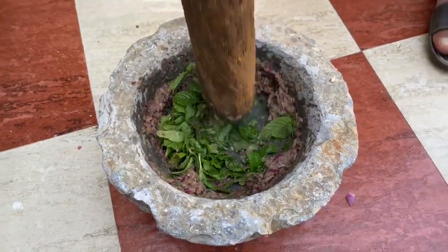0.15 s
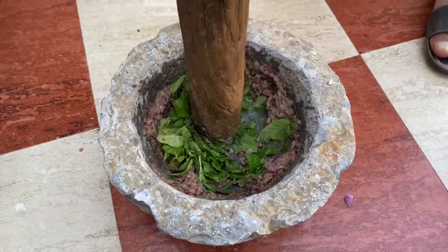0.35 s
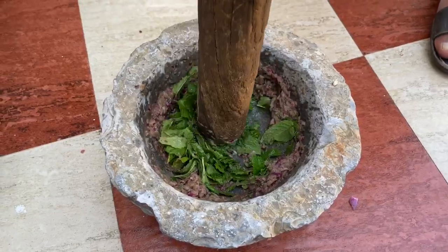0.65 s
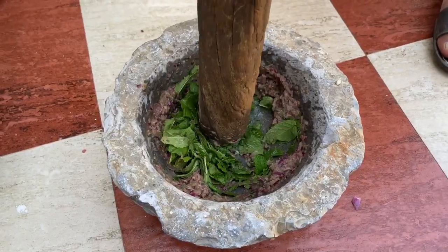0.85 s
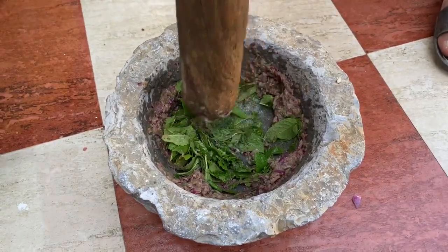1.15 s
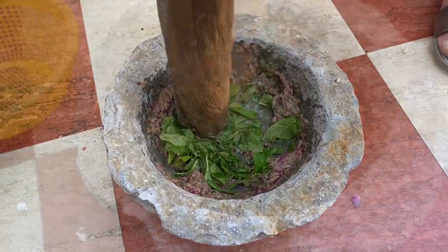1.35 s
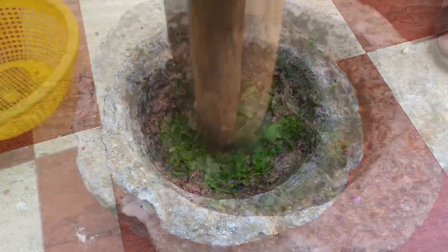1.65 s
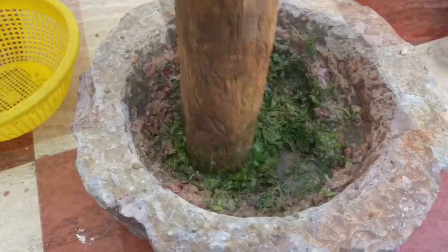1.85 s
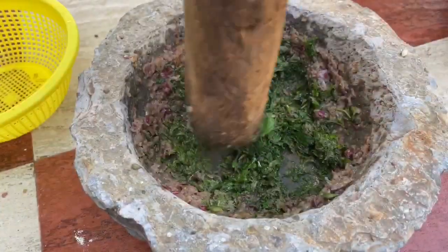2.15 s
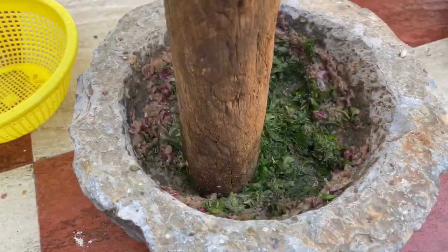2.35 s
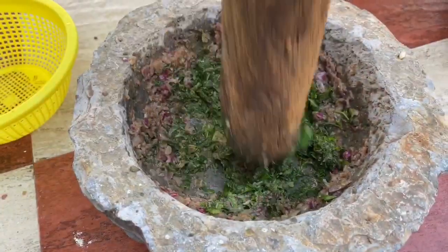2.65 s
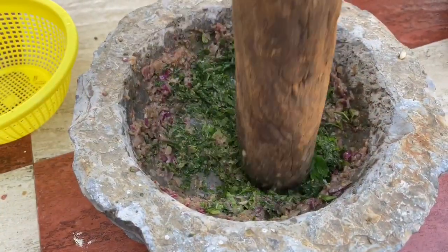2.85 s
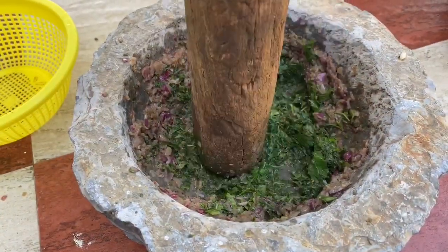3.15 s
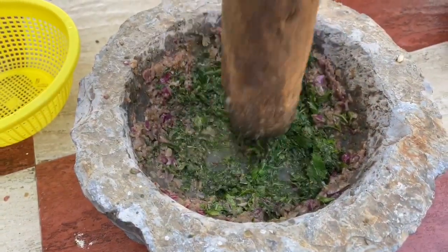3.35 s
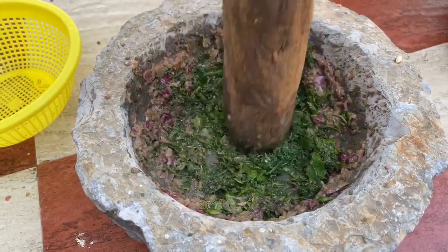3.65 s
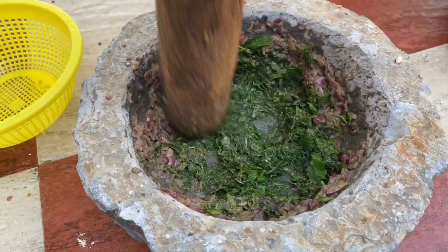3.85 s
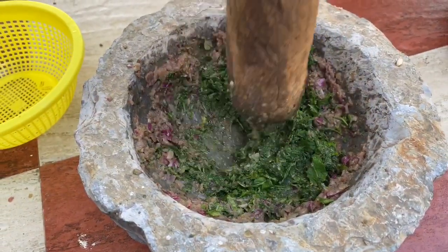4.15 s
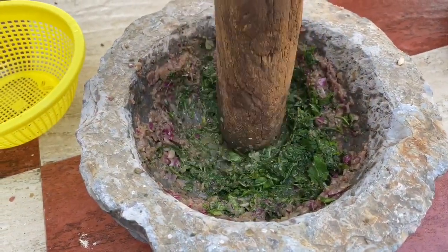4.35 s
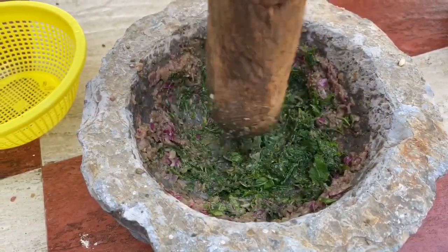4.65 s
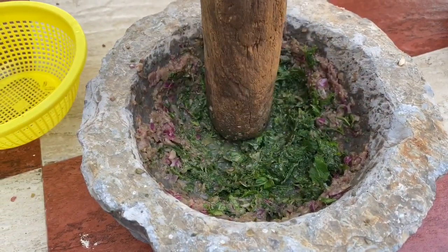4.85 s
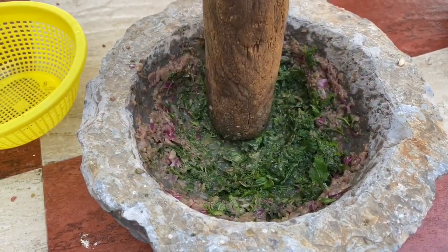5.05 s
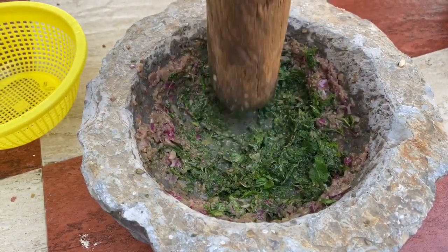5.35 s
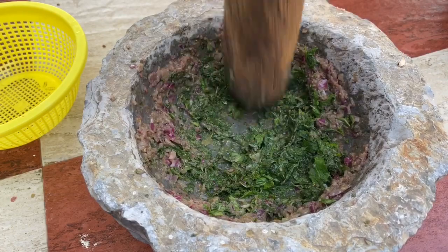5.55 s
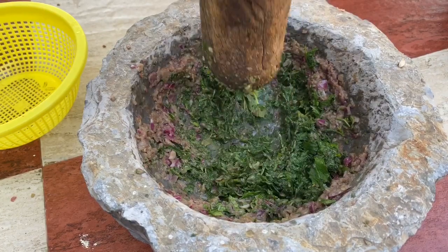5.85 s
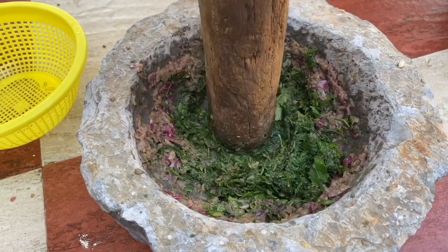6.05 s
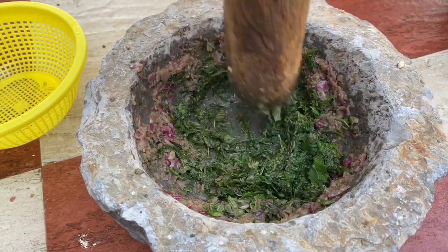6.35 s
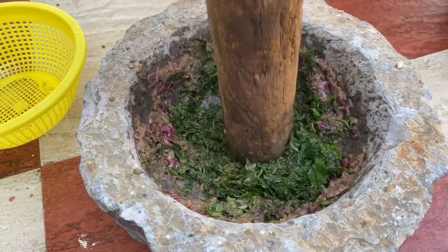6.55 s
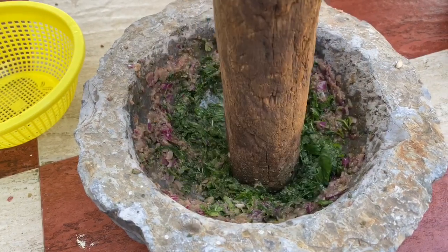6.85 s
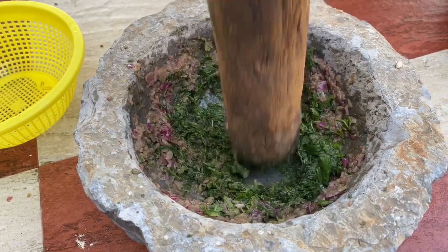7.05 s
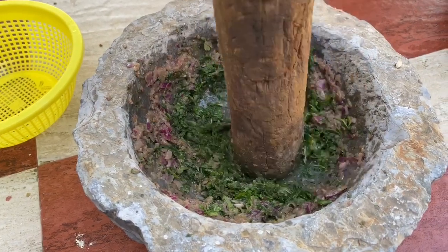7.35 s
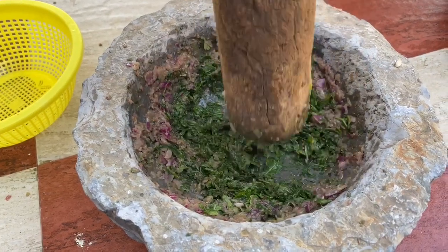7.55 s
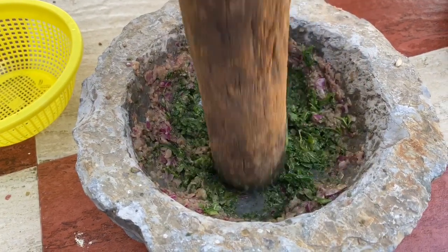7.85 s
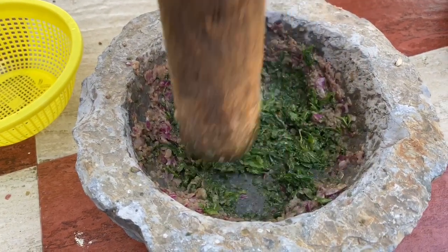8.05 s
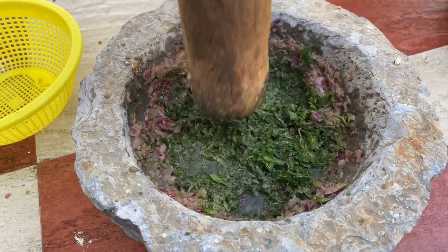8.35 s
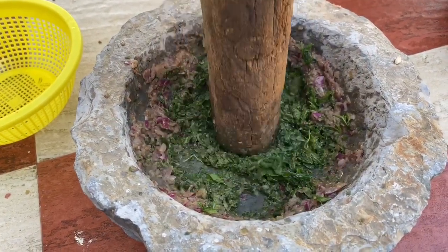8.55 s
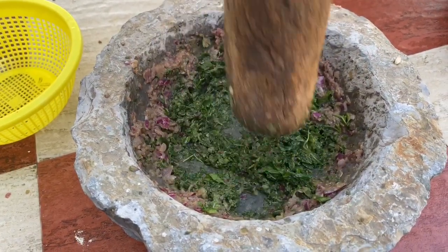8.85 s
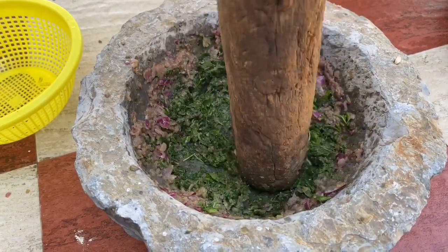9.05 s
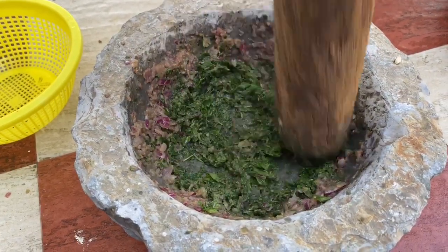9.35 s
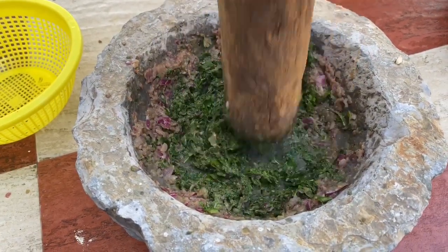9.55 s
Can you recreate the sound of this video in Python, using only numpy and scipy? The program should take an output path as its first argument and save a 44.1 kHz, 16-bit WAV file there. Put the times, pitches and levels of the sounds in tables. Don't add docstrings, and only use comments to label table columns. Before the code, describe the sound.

A heavy wooden pestle pounds wet leaves in a stone mortar, deep short thuds with knocks, juicy squelches and small snaps in a tiled kitchen.

```python
import sys
import numpy as np
from scipy import signal
from scipy.fft import rfft, irfft, next_fast_len
from scipy.io import wavfile
from scipy.ndimage import uniform_filter1d

SR = 44100
rng = np.random.default_rng(int(sys.argv[2]) if len(sys.argv) > 2 else 0)


def field_ratio(decibels):
    return 10 ** (np.asarray(decibels, dtype=float) / 20)


def put_to_file(sound):
    columns = np.atleast_2d(sound).T
    safe = np.clip(columns, -1, 1)
    whole_steps = np.round(safe * 32767)
    wavfile.write(sys.argv[1], SR, whole_steps.astype(np.int16))


N = 428211

# [f/Hz, level/dB, choke time/s, left minus right/dB]
WOOD_MODES = [(471.4, -9.5, 0.031, 18), (621.4, -2.5, 0.034, 7.5), (727.6, 4, 0.02, -1),
              (801.3, 0, 0.017, 17.5)]
STONE_MODES = [(937, -0.5, 0.028, -8), (1154, -4, 0.017, 20), (1320, 6, 0.006, 5.5),
               (1473, -8.5, 0.031, 14.5), (1865, -8.5, 0.045, 7.5), (2268, -33, 0.019, 6.5),
               (2895, -30.5, 0.1, -23.5)]
BOWL_MODES = [(188.5, -8.5, 0.032, -1.5), (215.8, 1, 0.027, 8.5), (243.8, 9.5, 0.015, -4.5),
              (316.4, -3.5, 0.045, 0.25), (417, -8, 0.017, -3)]
SLAB_MODES = [(92, -22, 0.097, -8.5), (100.9, -2, 0.038, 5.5), (122.6, -1.5, 0.031, -11)]


def blows():
    times, peak_db, slab_db, wood_db = contacts().T
    crack_db = np.maximum(1.5 + 2.2 * wood_db, wood_db - 10)
    knock_db = np.minimum(wood_db, -7.5)
    wood = struck_body(WOOD_MODES, peak_db + knock_db + 2.5)
    stone = struck_body(STONE_MODES, peak_db + crack_db + 2.0)
    bowl = struck_body(BOWL_MODES, peak_db - 2.5, crossing_s=0.0012)
    slab = struck_body(SLAB_MODES, peak_db + slab_db + 4.5, crossing_s=0.0033)
    return wood + stone - bowl - slab


def struck_body(modes, level_db, crossing_s=0):
    bending_s, first_hz = 0.09, 800
    spread_db, detune_share = 1.5, 0.03
    starts = contacts()[:, 0]
    out = np.zeros((2, N + SR))
    t = np.arange(SR // 8) / SR
    chance = rng.standard_normal((len(starts), len(modes), 2))
    for k, (hz, db, choke_s, pan_db) in enumerate(modes):
        late_s = crossing_s + max(0, bending_s * (hz ** -0.5 - first_hz ** -0.5))
        swell = 1 - np.exp(-t * hz * 5)
        choke = field_ratio(-60 * (t / choke_s / 1.333) ** 1.94)
        pan = field_ratio(np.array([[pan_db], [-pan_db]]) / 2)
        for start, blow_db, (luck, detune) in zip(starts, level_db, chance[:, k]):
            at = max(0, int((start + late_s) * SR))
            tone = np.sin(2 * np.pi * hz * (1 + detune_share * detune) * t)
            level = field_ratio(blow_db + db + spread_db * luck)
            out[:, at:at + len(t)] += level * swell * choke * tone * pan
    return out[:, :N]


# [t/s, peak level/dB, slab thump/dB re peak,
# wood knock (hardness)/dB re peak, pulp squirt level/dB]
STROKES = [(0.0, -15, -12, -6.5, -22), (0.397, -14, -2, -13, -34.5), (1.263, -24, 0, -42, -67),
           (1.47, -28.5, -6, -2.5, -39), (1.508, -18.5, -6, -15.5, -29.5), (1.699, -17.5, -7, -8, -36),
           (1.902, -9.5, -7.5, -6, -21), (2.295, -21, -21, -5.5, -26), (2.736, -8, -4.5, -6.5, -19.5),
           (3.145, -8, -8, -9.5, -21), (3.526, -8.5, -2.5, -8, -19), (3.916, -24, -0.5, -18, -36),
           (4.331, -7, -6.5, -8, -18.5), (4.784, -8, -4.5, -8.5, -19), (5.582, -19.5, -28, -12.5, -38.5),
           (6.039, -8, -9, -10, -56), (6.449, -13.5, -7.5, -13.5, -31), (6.886, -9, -2, -6, -16),
           (7.317, -19, -0.5, -15, -27), (7.705, -13.5, -5, -16.5, -24.5),
           (8.1514, -6.5, -7.5, -7.5, -22.5), (8.574, -7, -4.5, -8.5, -17), (8.9854, -8, -6, -5.5, -15),
           (9.409, -15.5, -2.5, -8.5, -16)]
# [t/s, peak level/dB, slab thump/dB re peak, wood knock/dB
REBOUNDS = [(0.01, -13, -16, -12), (0.023, -18, -39, -20), (2.036, -30, -37, -19), (2.302, -22.5, 2, -16),
            (2.328, -29.5, 4.5, -11), (2.355, -22.5, -15, -14.5), (2.452, -29, -20, -31),
            (3.162, -17.5, -9, -9), (3.275, -28.5, -11.5, -15), (3.904, -25, -22.5, -14),
            (3.932, -36.5, -0.5, -24), (3.981, -39.5, -19, -11), (4.096, -31, -41, -15),
            (5.269, -38, -20, -18), (5.598, -21, 0, -22), (5.632, -19.5, -8.5, -14.5),
            (5.754, -34.5, -1.5, -4), (6.064, -20, -2, -11), (6.177, -31.5, -4, -19),
            (6.473, -17.5, -8, -9.5), (7.34, -26, 8, -17), (7.727, -12.5, -0.5, -11), (8.179, -18, -5, -8),
            (9.429, -21, 0.5, -16)]


def contacts():
    return np.array(sorted([row[:4] for row in STROKES] + REBOUNDS))


# [f/Hz, level/dB]
PULP_TONE = [(600, 1), (1300, 0.5), (2300, 1.5), (3200, -3), (4500, -1.5), (6200, -3.5), (8200, -9),
             (10200, -5), (12200, -14), (14200, -2.5), (15500, -39), (16400, -50.5)]
# [f/Hz, left minus right/dB]
PULP_BALANCE = [(700, 5.5), (1300, -1.5), (2400, -1.5), (4400, 0.5), (8000, -4.5), (15000, 1.5)]


def pulp():
    t, dull, bright = np.arange(N) / SR, np.zeros(N), np.zeros(N)
    for crest_s, db, swell_ms, fade_ms, bright_db in bursts():
        near = slice(max(0, int((crest_s - 0.1) * SR)), int((crest_s + 0.25) * SR))
        ms = (t[near] - crest_s) * 1000
        rise = np.exp(-np.abs(ms / swell_ms / 0.89) ** 1.02)
        crest = np.where(ms < 0, rise, np.exp(-ms / fade_ms))
        squelch = field_ratio(-25.5) * (ms > 0) * np.exp(-(ms / 52) ** 4)
        dull[near] += field_ratio(db - bright_db / 2) * (crest + squelch)
        bright[near] += field_ratio(db + bright_db / 2) * (crest + squelch)
    cells_per_s = 8000
    sizes = field_ratio(4.5 * np.minimum(rng.exponential(1, N), 5)) * rng.choice([-1, 1], N)
    grains = rms_one(sizes * (rng.random(N) < cells_per_s / SR))
    grains = grains + 0.96 * rng.standard_normal((2, N))

    def high_share(hz):
        return 1 / (1 + (5500 / (hz + 1)) ** 4)

    def tone(hz):
        balance_db = np.array([[1], [-1]]) * at_hz(PULP_BALANCE, hz) / 2
        bass_cut = hz ** 2 / (hz ** 2 + 400 ** 2)
        return field_ratio(at_hz(PULP_TONE, hz) + balance_db) * bass_cut

    mix = shape(grains * dull, lambda hz: 1 - high_share(hz)) + shape(grains * bright, high_share)
    mix = patchy(mix, cycles=5.5, patchy_db=1.6, rate=9.0)
    return field_ratio(7.5) * shape(mix, tone)


# [t/s of crest, level/dB, fade/ms, brightness/dB]
CRUSHES = [(0.39, -19.5, 5.4, -7), (1.2544, -22, 4.9, -7), (1.498, -27, 5, -3), (1.694, -25, 6.4, -2),
           (2.319, -41.5, 6.9, -10), (2.3292, -42, 3.4, -5), (2.728, -19, 2.2, -1), (3.139, -21, 3.3, -4),
           (3.516, -27, 2.3, -10), (3.886, -39, 9.7, -11), (3.907, -30, 7.3, 1), (3.936, -34.5, 2.2, 13),
           (4.3632, -35, 9.4, 5), (4.837, -39.5, 8.1, -1), (5.611, -27.5, 10, -5), (5.6274, -32, 12, -6),
           (5.649, -37, 2.7, 6), (6.0293, -13.5, 6.6, -2), (6.443, -16.5, 4.5, 1), (6.874, -31.5, 10, 0),
           (7.3407, -22.5, 3.7, -3), (7.7285, -19.5, 2.6, -11), (8.1434, -15.5, 2.6, 6),
           (8.193, -43, 21, 2), (8.565, -23, 2.4, -7), (8.977, -16, 3, 1)]
# [t/s, level/dB, fade/ms, pop level/dB]
LIFTS = [(0.115, -46, 13, -64), (1.377, -51, 30, -60), (2.0632, -48, 13, -60), (2.465, -42, 12, -39),
         (2.8686, -43.5, 12, -43), (3.285, -50.5, 53, -30), (3.6644, -42.5, 31, -24),
         (4.0734, -51.5, 42, -28), (4.508, -47.5, 25, -45), (5.1962, -52, 20, -28.5),
         (5.28, -50.5, 47, -57), (5.345, -54.5, 27, -45), (5.7436, -45, 32, -45), (6.1755, -44, 6.3, -50),
         (6.588, -44, 14, -38), (7.0355, -50, 5, -27), (7.053, -46, 8, -55), (7.457, -47.5, 40, -60),
         (8.2828, -42.5, 7.9, -44), (8.299, -47.5, 7.8, -58), (8.684, -48.5, 16, -60),
         (9.125, -47.5, 135, -28), (9.537, -41.5, 10.6, -73)]


def bursts():
    squirts = [(s - 0.001, db, 1.7, 7.8, 11 + 0.5 * db) for s, *_, db in STROKES]
    crushes = [(s, db, max(1, -2.7 - 0.3484 * db), fade_ms, bright_db)
               for s, db, fade_ms, bright_db in CRUSHES]
    peels = [(s, db, 0.7 * fade_ms, fade_ms, -4.5) for s, db, fade_ms, _ in LIFTS]
    return squirts + crushes + peels


# [t/s, peak level/dB, f/Hz]
SNAPS = [(0.3952, -0.5, 9870), (1.2578, -5.5, 6360), (1.5102, -4.5, 5880), (1.8998, -0.5, 6200),
         (2.293, -8.5, 9640), (2.297, -7, 4540), (2.3309, -3.5, 6520), (2.736, -4.5, 4030),
         (3.1376, -4.5, 6300), (3.143, -2, 4550), (3.5242, -17.5, 3850), (3.917, -19.5, 4550),
         (3.937, -8.5, 4720), (4.327, -13.5, 10060), (4.339, -16.5, 4830), (4.36, -21, 6330),
         (4.7815, -10, 4180), (5.6484, -19, 3510), (6.0304, -6, 6150), (6.442, -17, 5200),
         (6.4532, 2, 4820), (6.8831, -15.5, 5740), (7.3385, -10, 6200), (7.7274, -1.5, 6550),
         (8.144, -5, 6700), (8.1512, -1.5, 6130), (8.5707, -11, 6370), (8.9783, -14.5, 7200),
         (8.9847, -21, 6500), (9.408, -5.5, 9960)]


def snaps():
    pops = [(s, pop_db, 4400) for s, *_, pop_db in LIFTS]
    out, t = np.zeros(N + SR), np.arange(SR // 200) / SR
    for s, db, hz in SNAPS + pops:
        ring = np.cos(2 * np.pi * hz * t) * np.exp(-t * hz / 4.9)
        click = rng.standard_normal(len(t)) * np.exp(-t / 0.00028)
        at = int(s * SR)
        out[at:at + len(t)] += field_ratio(db - 6.0) * (ring + 0.88 * click)
    return np.diff(out)[:N]


# [f/Hz, fade/s]
ROOM_FADE = [(60, 0.62), (160, 0.56), (420, 0.54), (1100, 0.48), (3000, 0.51), (8000, 0.23)]


def kitchen(x):
    lags_s = rng.uniform(0.014, 0.05, (10, 2, 1))
    signs = rng.choice([-1, 1], (10, 2, 1))

    def response(hz):
        total = 0
        for lag_s, sign in zip(lags_s, signs):
            loss = field_ratio(-60 * lag_s / at_hz(ROOM_FADE, hz))
            trip = loss * np.exp(-2j * np.pi * hz * lag_s)
            total = total + sign * trip / (1 - trip)
        alike = likeness(hz)
        return np.sqrt(alike) * total[:1] + np.sqrt(1 - alike) * total
    return shape(x, response)


# [f/Hz, level/dB]
HISS_TONE = [(18, -24), (30, -31.5), (115, -8), (170, -27), (780, -27.5), (866, -28), (1070, -26.5),
             (1430, -21.5), (4190, -21.5), (5310, -20), (8520, -31.5), (10200, -31), (12000, -39),
             (14700, -31.5), (16000, -58)]
# [f/Hz, width/Hz, level/dB]
HUM = [(53, 13, -54.5), (119, 3.4, -60.5), (179.3, 13, -55)]


def background():
    middle, side = rng.standard_normal((2, N))
    pair = shape(middle, lambda hz: np.sqrt(1 + likeness(hz)))
    pair = pair + np.array([[1], [-1]]) * shape(side, lambda hz: np.sqrt(1 - likeness(hz)))

    def low_share(hz):
        return 1 / (1 + (hz / 700) ** 2)

    rumble = rms_one(shape(pair, lambda hz: field_ratio(at_hz(HISS_TONE, hz)) * low_share(hz)))
    patches = patchy(pair, cycles=3.5, patchy_db=2.5, rate=5.0, size=15013)
    hiss = rms_one(shape(patches, lambda hz: field_ratio(at_hz(HISS_TONE, hz)) * (1 - low_share(hz))))
    flicker_db = 0.8 * drift(20) + 1.3 * drift(3.5)
    out = rumble * field_ratio(-46.5) + hiss * field_ratio(-60.5 + flicker_db)
    for hz, width_hz, db in HUM:
        out += field_ratio(db) * rms_one(shape(pair, lambda f: 1 / (1 + ((f - hz) / width_hz) ** 2)))
    return out


# [f/Hz, likeness]
LIKENESS = [(60, 1), (130, 0.92), (290, 0.64), (640, 0.093), (1410, 0.067), (3100, -0.16), (6820, 0.11),
            (15000, 0.57)]


def likeness(hz):
    return np.clip(at_hz(LIKENESS, hz), 0, 1)


def patchy(x, cycles, patchy_db, rate, size=0):
    out = 0
    for k, hz in enumerate(np.geomspace(500, 16000, 26)):
        r = np.exp(-np.pi * hz / cycles / SR)
        top = [(1 - r * r) / 2, 0, (r * r - 1) / 2]
        bottom = [1, -2 * r * np.cos(2 * np.pi * hz / SR), r * r]
        shifted = np.roll(x, k * size, axis=-1)
        band = signal.lfilter(top, bottom, shifted + 1e-18)
        out = out + (-1) ** k * band * field_ratio(patchy_db * drift(rate))
    return out


def drift(rate):
    knots = rng.standard_normal(600)
    return np.interp(np.arange(N) * rate / SR, np.arange(600), knots)


def at_hz(points, hz):
    p = np.array(points, float)
    return np.interp(np.log(np.maximum(hz, 1)), np.log(np.maximum(p[:, 0], 1)), p[:, 1])


def rms_one(x):
    return x / np.sqrt(np.mean(x ** 2) + 1e-20)


def shape(x, gain):
    size = next_fast_len(N + SR)
    hz = np.arange(size // 2 + 1) * SR / size
    return irfft(rfft(x, size) * gain(hz), size)[..., :N]


# [f/Hz, lead/radians]
PORT_PHASE = [(0, 0.5), (1460, 1), (1720, 4), (2410, -0.13), (3190, 4.5), (6550, 5.5), (7410, 11.5),
              (7920, 11), (8870, 9), (9650, 6.5), (13600, 0.5), (14400, 7.5), (15300, 8.5), (16000, -3)]


def scene():
    thud = blows()
    wet = pulp() + snaps()
    port_hz, lead = np.transpose(PORT_PHASE)

    def port_lag(hz):
        return np.exp(-1j * np.interp(hz, port_hz, lead) * np.array([[0], [1]]))

    room = kitchen(field_ratio(-26.5) * thud.mean(axis=0) + field_ratio(-29.5) * wet.mean(axis=0))
    return shape(thud + wet, port_lag) + room + background()


def low_pass(x):
    return signal.sosfilt(signal.butter(12, 16480, fs=SR, output="sos"), x)


def record(dry):
    x = shape(dry, lambda hz: 1 - 0.76 * np.exp(-((hz - 12150) / 480) ** 2))
    x = signal.sosfilt(signal.butter(4, 48, "high", fs=SR, output="sos"), x)
    x = signal.sosfilt(signal.butter(10, 15500, fs=SR, output="sos"), x)
    over_db = np.maximum(20 * np.log10(np.abs(x).max(axis=0) + 1e-9) + 2.0, 0)
    fall_db = 250 * np.arange(N) / SR
    held_db = np.maximum(np.maximum.accumulate(over_db + fall_db) - fall_db, 0)
    x = x * field_ratio(-0.8 * uniform_filter1d(held_db, size=45))
    x = np.clip(x, -0.93, 0.93)
    return low_pass(x)


dry = scene()
out = record(dry)
put_to_file(out)
```